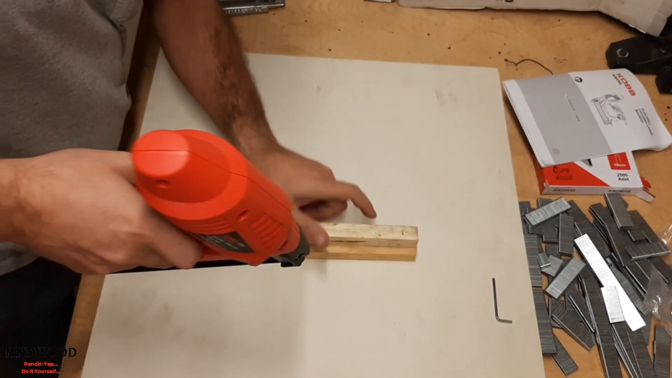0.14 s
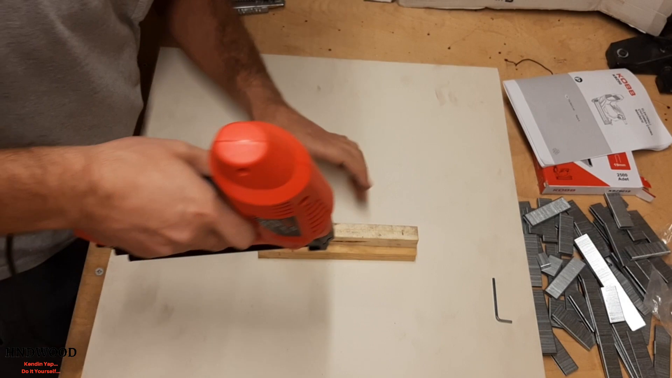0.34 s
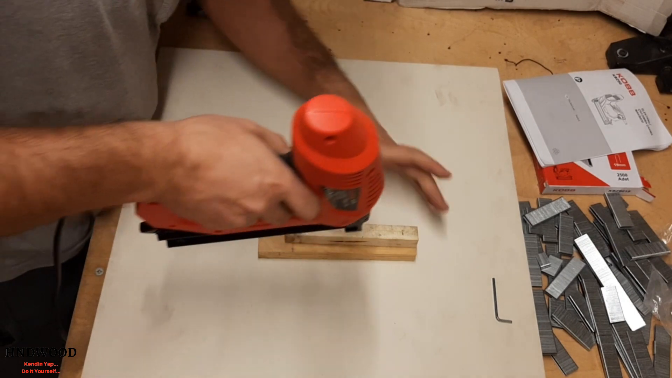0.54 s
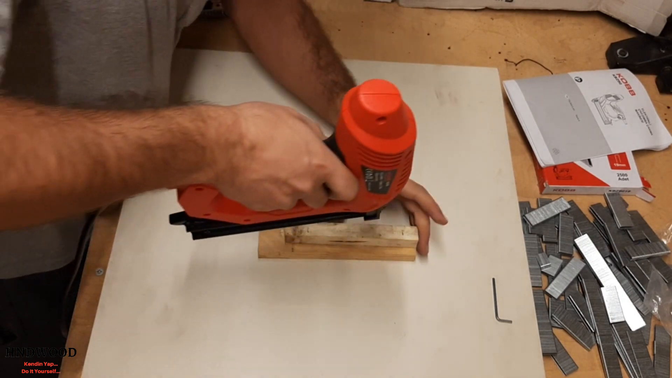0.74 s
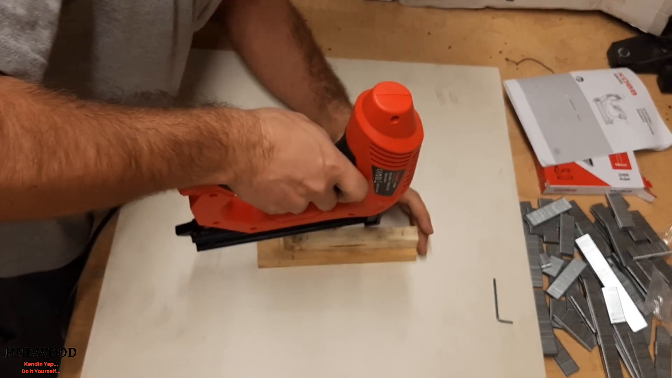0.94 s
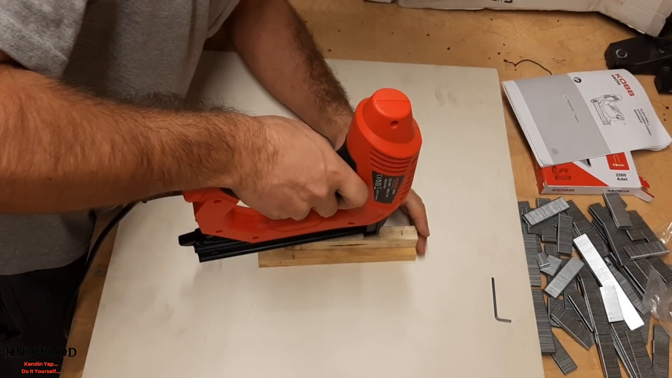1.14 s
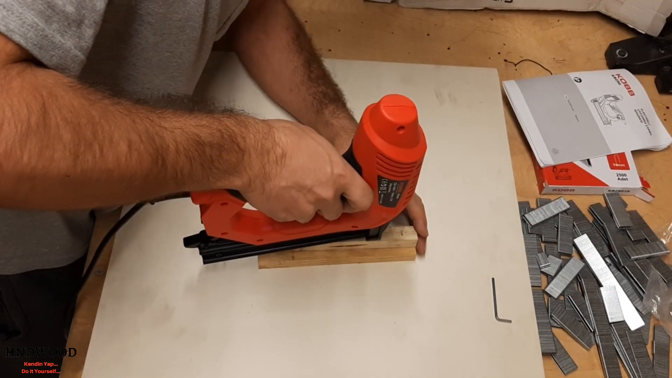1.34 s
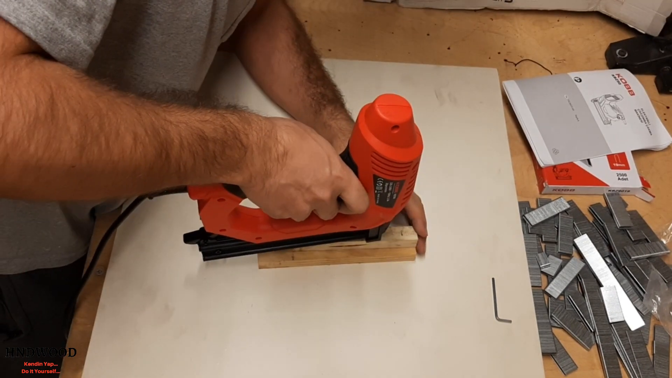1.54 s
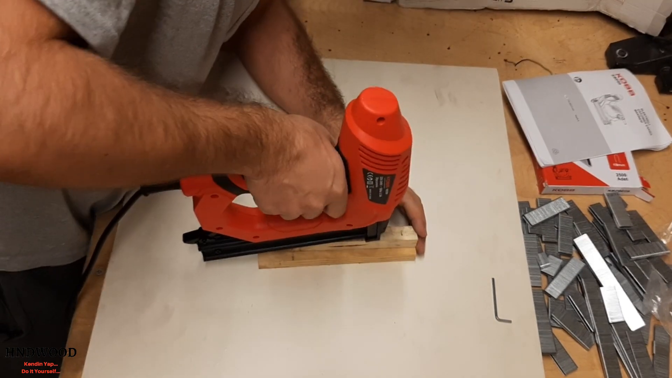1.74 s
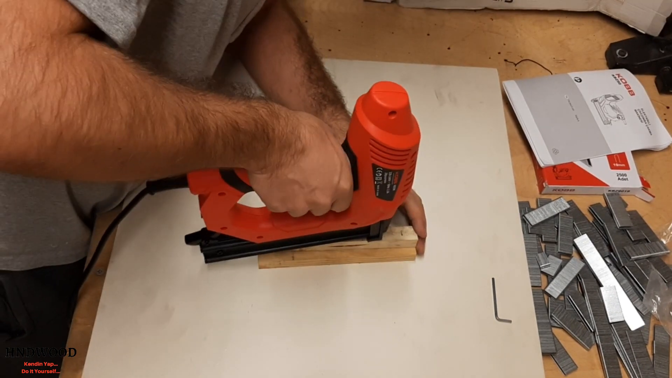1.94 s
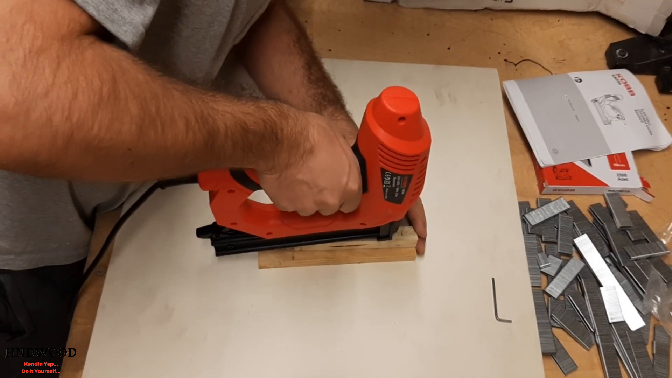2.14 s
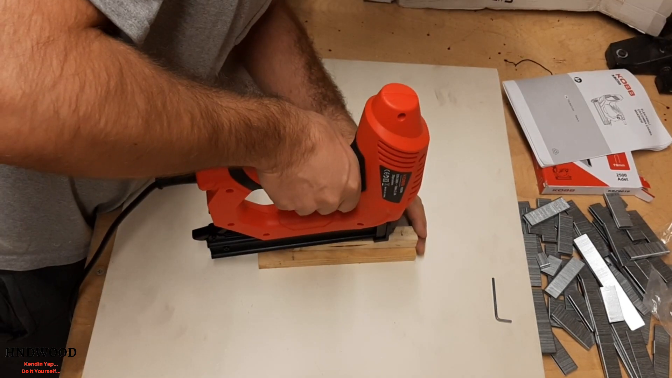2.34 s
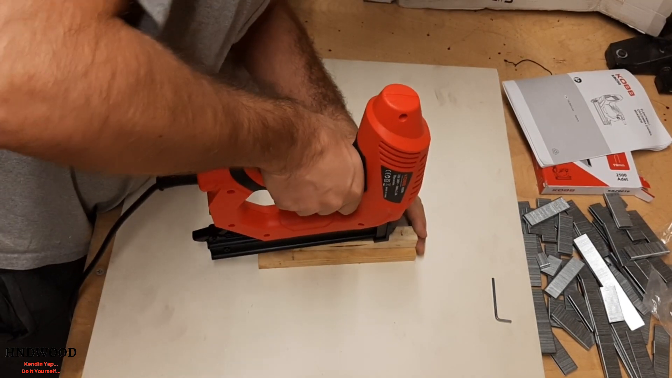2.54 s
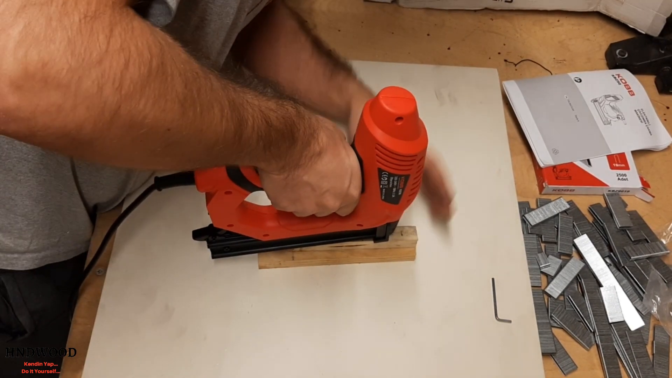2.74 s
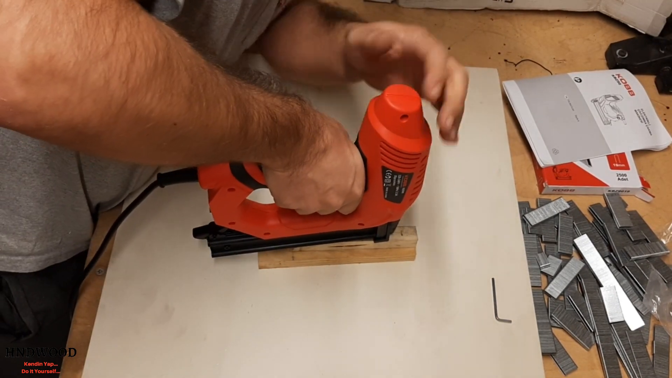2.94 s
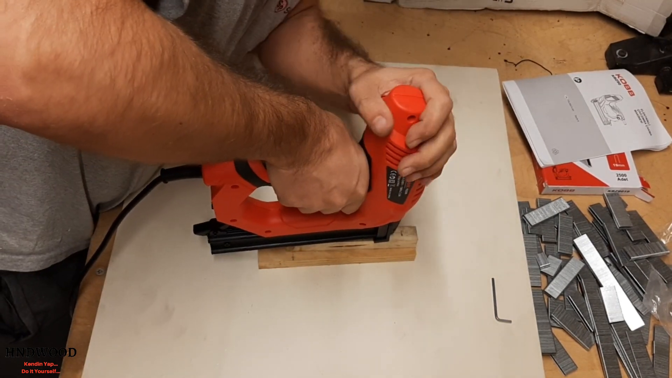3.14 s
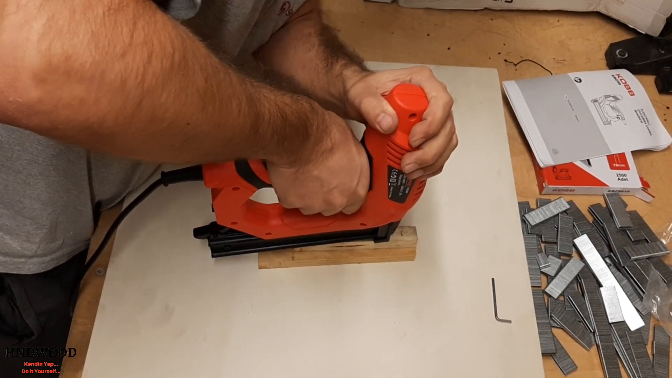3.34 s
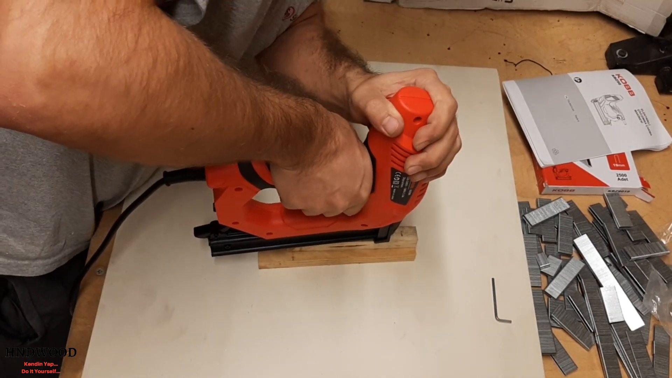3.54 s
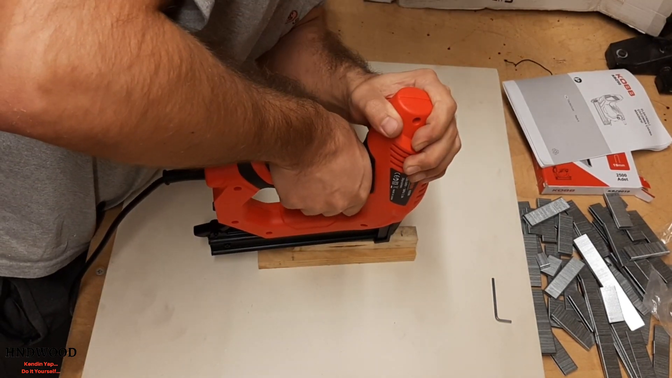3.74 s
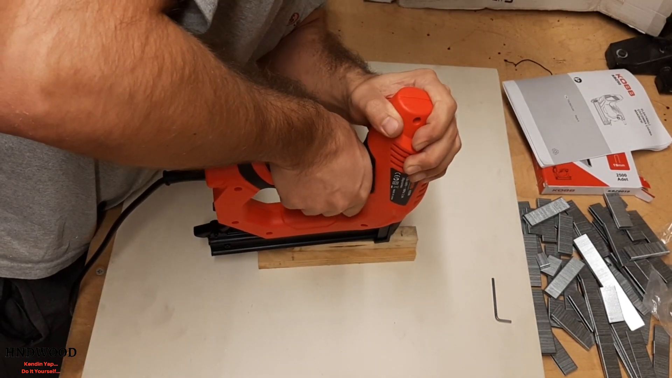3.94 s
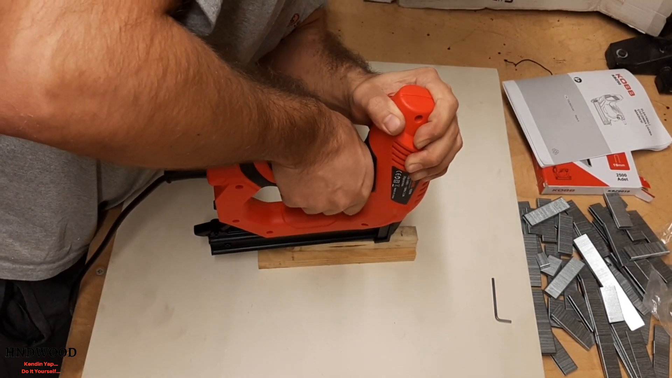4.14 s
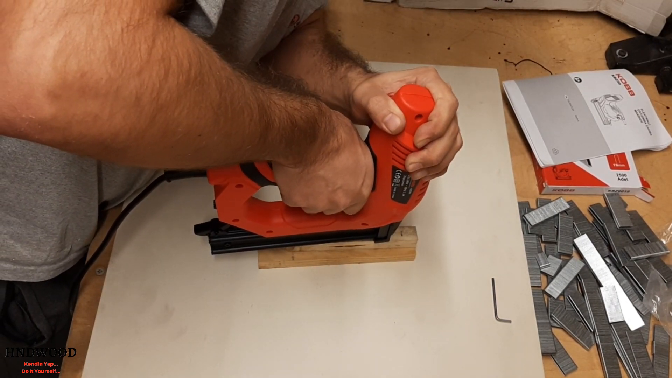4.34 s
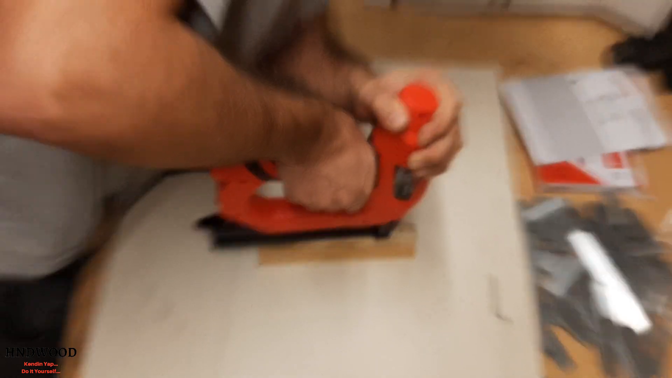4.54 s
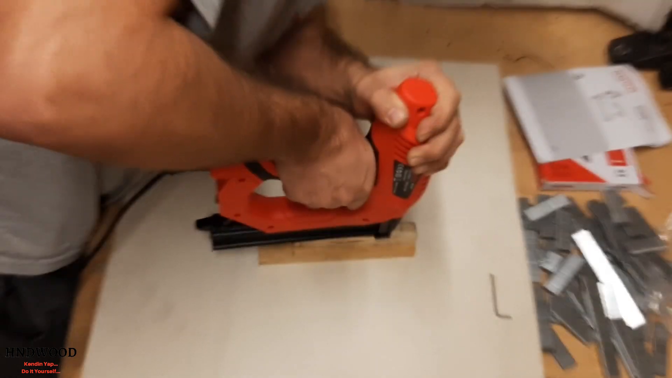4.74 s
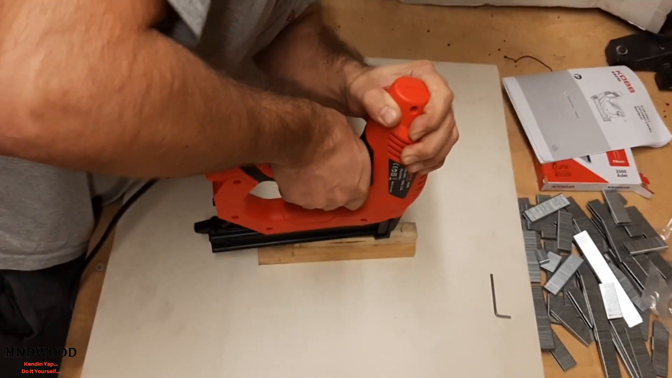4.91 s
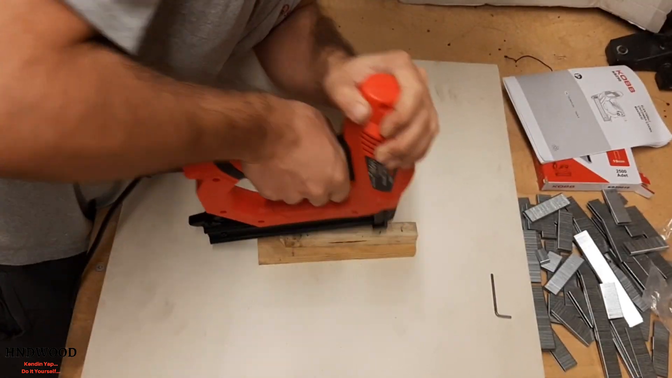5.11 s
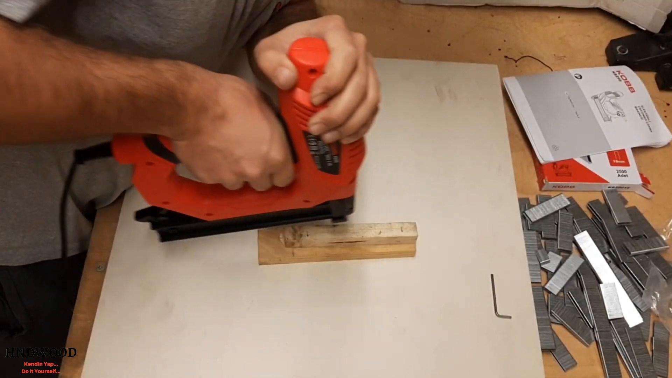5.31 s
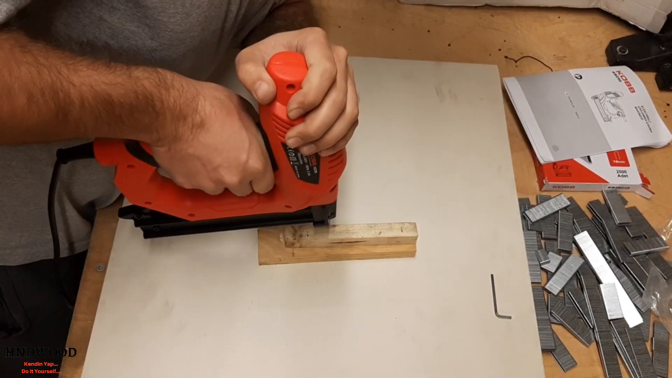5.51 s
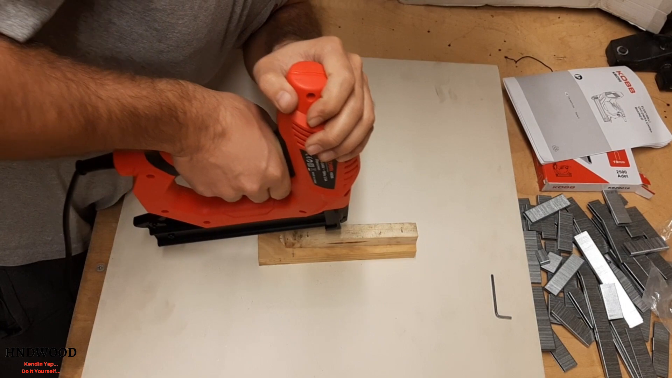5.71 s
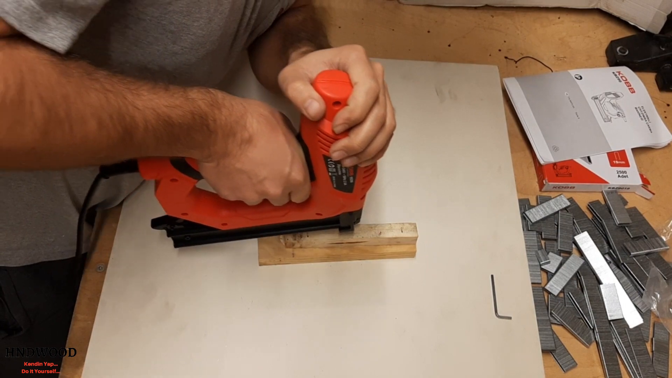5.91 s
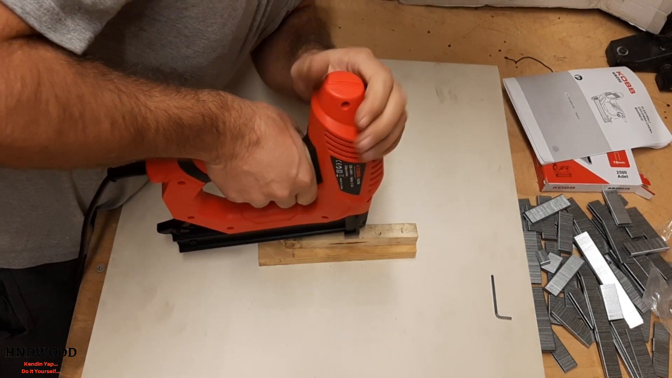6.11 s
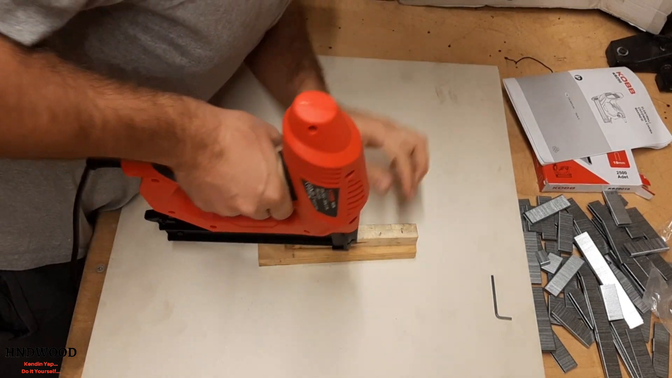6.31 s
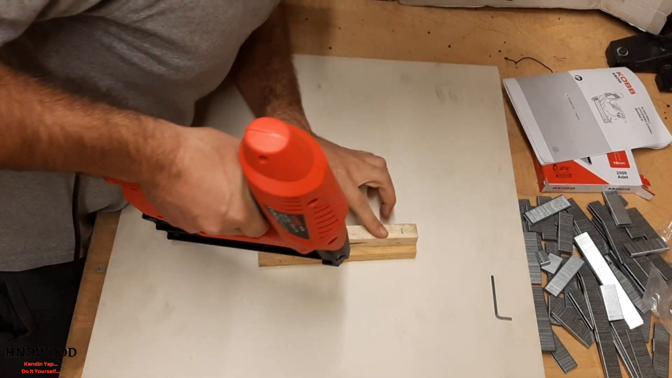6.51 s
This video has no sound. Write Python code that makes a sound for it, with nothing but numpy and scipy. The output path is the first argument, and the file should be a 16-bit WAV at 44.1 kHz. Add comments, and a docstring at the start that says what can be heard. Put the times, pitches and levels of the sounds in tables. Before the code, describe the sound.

Soft taps of a nailer settling on a wooden block, then a single loud crack with a thud, a click and short metallic chatter.

```python
"""An electric nailer is set on a wood block on a workbench: light knocks, scrapes, hands on the housing.
From about 4 s a faint hum swells and fades. At 4.5 s the trigger clicks; the solenoid slams the driver
onto the nail, the block cracks, the bench booms, the microphone's gain control ducks for a second.
The tool recoils, the plunger flies back, its spring chatters, the trigger is released; a last knock.
Throughout: a small workshop's reflections, low rumble and hiss."""
import sys
import numpy as np
from scipy import signal
from scipy.fft import rfft, irfft, next_fast_len
from scipy.io import wavfile
from scipy.ndimage import uniform_filter1d, minimum_filter1d

SR = 44100
rng = np.random.default_rng(int(sys.argv[2]) if len(sys.argv) > 2 else 0)


def file_out(sig):
    """Save sig as 16-bit WAV at sys.argv[1]."""
    # one column per channel
    cols = np.atleast_2d(sig).T
    # limit, then scale
    lim = np.clip(cols, -1, 1)
    pcm = np.round(lim * 32767).astype(np.int16)
    wavfile.write(sys.argv[1], SR, pcm)


N = 294044
TIME_S = np.arange(N) / SR
AGE_S = np.arange(2 ** 15) / SR  # time since a blow
FIRE_S, SHOT_LOW_HZ = 4.5982, 248

# nose on block: t/s, crack/dB, ring/dB, boom/dB, low cut/Hz, high cut/Hz, graze re crack/dB
KNOCKS = [(0.007, -45.5, -51, -58, 207, 4170, 3), (0.443, -46.5, -47.5, -66, 180, 2400, -6),
          (1.05, -74.5, -78, -80, 300, 1500, -10), (1.096, -64, -65, -77, 150, 600, -10),
          (1.470, -62, -61.5, -50.5, 135, 990, -5), (1.578, -64.5, -71, -54, 100, 300, -10),
          (1.805, -52.5, -50.5, -44.5, 100, 710, -1.5), (2.117, -44, -54.5, -40.5, 120, 875, -6.5),
          (2.406, -75.5, -75.5, -44.5, 150, 1200, -10), (6.497, -50, -48.5, -62, 540, 1170, -27)]
# safety tip, trigger, returning plunger, release: t/s, level/dB, high cut/Hz, room/dB, ring re level/dB
CLICKS = [(0.004, -51.5, 8750, -1, -10), (2.108, -54, 11400, -5.5, -20), (4.513, -36, 10200, -0.5, -29),
          (4.795, -26, 8500, -3.5, -27), (5.1225, -47, 6900, -3.5, -4)]
# nose dragged on block: mid t/s, length/s, level/dB
SCRAPES = [(0.843, 0.08, -58), (0.91, 0.13, -60), (1.468, 0.049, -62), (2.09, 0.14, -61),
           (2.235, 0.28, -74.5)]
# hands sliding on housing: mid t/s, length/s, level/dB, squeak f/Hz, squeak re level/dB
SWISHES = [(0.91, 0.15, -82.5, 5640, 0), (1.652, 0.063, -74, 3600, -21), (1.785, 0.3, -76, 3510, -7.5),
           (2.057, 0.13, -67.5, 11700, -8.5), (2.121, 0.062, -61, 4970, -12),
           (2.276, 0.11, -74.5, 11950, -4), (3.12, 0.086, -61, 5230, -14), (6.161, 0.077, -63.5, 2950, -17)]
# rumble swells as hands lean on the tool: mid t/s, length/s, level/dB
LEANS = [(1.994, 1.3, -60.5), (3.25, 0.34, -51), (4.602, 1.9, -54.5), (6.67, 1.13, -60)]
# hum swells: mid t/s, length/s, level/dB, f/Hz
HUMS = [(4.44, 0.6, -71, 465), (5.562, 0.61, -66, 464.5), (5.993, 0.26, -65, 440.2), (6.66, 0.22, -68, 468)]

# modes of block, bench, steel parts, return spring, hollow housing: f/Hz, level/dB, t60/s
WOOD_MODES = [(203, -4, .22), (275, -2, .28), (305, 3, .33), (337, -4, .28), (423, -1, .3), (500, -6, .33),
              (561, 3, .25), (640, -3, .22), (684, -3, .28), (937, -2, .2), (966, -5, .2), (1047, -7, .2),
              (1123, -2, .17), (1279, -4, .21), (1495, -4, .18), (1523, -3, .2), (1552, -7, .18),
              (2023, -6, .2), (2300, -8, .2), (2780, -11, .16)]
BENCH_MODES = [(55.5, -18, .4), (69, -3.5, 0.32), (76.8, 4, 0.48), (88, -7, 0.6), (101, -9.5, 0.61),
               (125.7, -8, 0.42)]
STEEL_MODES = [(2960, -10, .2), (5710, -10, .18), (6130, -6, .16), (6450, -3, .22), (7400, -3, .15),
               (12630, -4, .23), (14390, -10, .24)]
SPRING_MODES = [(700, -5, .15), (820, -4, .15), (930, -6, .14), (1850, -3, .05), (2370, -3, .06),
                (2850, 4, .025), (4430, 3, .017)]
HOUSING_MODES = [(133.2, -0.5, 0.38), (205.7, -4, 0.41), (305, 3, 0.23), (468, -13, 0.16), (568, -10, 0.17),
                 (1560, -4.5, .22)]

# source spectra and microphone response: f/Hz, level/dB
WOOD_SPECTRUM = [(40, -22), (150, -9), (280, 1), (370, -6), (450, -1), (620, 2), (780, -5), (1000, -2.5),
                 (1600, -6), (1900, -10), (3000, -12), (7000, -14), (16000, -21)]
STEEL_SPECTRUM = [(60, -20), (400, -11), (900, -9), (1400, -1.5), (2000, -2), (2700, 0.5), (3600, -2),
                  (5000, -1), (7500, 0), (11000, -3), (16000, -3)]
SPRING_SPECTRUM = [(100, -8.5), (800, -0.5), (1300, -6.5), (2400, -9), (2900, 1.5), (3500, -2.5),
                   (4400, -3.5), (7000, -6.5), (9000, -32), (16000, -20)]
SCRAPE_SPECTRUM = [(80, -10), (350, -14), (600, -0.5), (780, -7), (1100, -4.5), (1550, -10), (1900, -20.5),
                   (4000, -24), (16000, -39)]
SKIN_SPECTRUM = [(200, -28), (2200, -14.5), (3300, -4.5), (5500, -0.5), (7500, -5.5), (11000, -7.5),
                 (16000, -5)]
RUMBLE_SPECTRUM = [(15, -29), (32, -17), (45, -5), (57, 5.5), (75, -6), (100, -12), (125, -4.5),
                   (160, -19.5), (220, -20.5), (320, -27.5), (500, -46), (1500, -62)]
HISS_SPECTRUM = [(30, 7), (300, 12.5), (700, 3), (1500, 1.5), (3000, -2), (7000, -7), (9000, -0.5),
                 (12000, 0), (15500, 0.5)]
MIC_RESPONSE = [(5, -40), (22, -13), (42, 1), (7500, -2), (8300, -15), (9000, -18), (10000, -9),
                (12000, -2.5), (15500, 2), (16300, -13)]

# workshop decay: f/Hz, t60/s
ROOM_T60 = [(80, 0.86), (300, 0.33), (1000, 0.24), (3000, 0.29), (7000, 0.22), (15000, .26)]
# left-right coherence of direct and reflected sound: f/Hz, coherence/1
DIRECT_COHERENCE = [(100, 1), (300, .93), (700, .85), (1600, .55), (4000, .2), (12000, 0)]
DIFFUSE_COHERENCE = [(80, .97), (300, .8), (650, .4), (1400, 0), (16000, 0)]
# stereo balance: f/Hz, left minus right/dB
BALANCE = [(60, -1.15), (600, -3), (2000, -0.5), (5000, -2.5), (12000, -2.5)]


def nail(shove_gap_s=0.0033):
    """The nail sinks in three shoves, each weaker and duller; the block rings, the bench booms."""
    out = np.zeros((2, N))
    for k in range(3):
        shove = wood_crack(db=-1.5 - 2.5 * k, low_hz=SHOT_LOW_HZ, high_hz=4500 * 0.5 ** k, room_db=-1.5)
        add(out, FIRE_S + k * shove_gap_s, shove)
    block = wood_ring(db=2.5, low_hz=SHOT_LOW_HZ, high_hz=2800, spread_s=0.004)
    add(out, FIRE_S + shove_gap_s, block)
    add(out, FIRE_S + 0.004, bench_boom(db=-2))
    return out


def plunger(run_up_s=0.0102, growth_db_per_s=1899.5):
    """The solenoid pulls the plunger down its guide, rattling faster and louder, onto the nail."""
    out = np.zeros((2, N))
    for k in range(3):
        lead_s = run_up_s * (1 - k / 3) ** 1.35
        db = -12 - growth_db_per_s * lead_s
        add(out, FIRE_S - lead_s, steel_click(db, t60_s=0.037, high_hz=9300, room_db=-1.5, ring_db=-19.5))
    add(out, FIRE_S, steel_click(db=-10, t60_s=0.016, high_hz=16000, room_db=-4, ring_db=-21))
    return out


def recoil(drop_s=FIRE_S + 0.031, clatter_gap_s=0.0072):
    """The nailer drops back on the block; the plunger clatters against its stop."""
    out = np.zeros((2, N))
    add(out, drop_s, wood_crack(db=-10.5, low_hz=SHOT_LOW_HZ, high_hz=2550))
    for k in range(3):
        clatter = steel_click(-7.5 - 3 * k, t60_s=0.026, high_hz=14100 * 0.85 ** k, room_db=-1, ring_db=-10)
        add(out, drop_s + k * clatter_gap_s, clatter)
    return out


def spring(start_s=4.8, stop_s=5.0, fade_s=0.029, surge_hz=103, ping_hz=1780):
    """The return spring surges to and fro, pinging and buzzing, and sings as the plunger slides home."""
    gate = (1 + np.tanh((TIME_S - start_s) / fade_s)) * (1 - np.tanh((TIME_S - stop_s) / fade_s)) / 4
    surges = np.diff(np.floor(surge_hz * TIME_S), prepend=0) * rng.uniform(0.7, 1.3, N)
    ping = decay(t60_s=0.0096) * np.sin(2 * np.pi * ping_hz * AGE_S)
    pings = unit_rms(signal.oaconvolve(surges, ping)[:N]) * np.clip((stop_s - TIME_S) / 0.13, 0, 1)
    buzz = unit_rms(colour(convolve(surges[None], room_tail()), SPRING_SPECTRUM))
    slide = coloured_noise(DIFFUSE_COHERENCE, SPRING_SPECTRUM)
    song = rubbed_modes(SPRING_MODES) * np.clip((TIME_S - start_s) / 0.092, 0, 1)
    chatter = amp(-45) * pings + amp(-54) * buzz + amp(-52) * slide + amp(-49) * song
    return in_room(gate * chatter, room_db=-6)


def clicks(t60_s=0.017):
    """Small steel parts click before and after the shot."""
    out = np.zeros((2, N))
    for t_s, db, high_hz, room_db, ring_db in CLICKS:
        add(out, t_s, steel_click(db, t60_s, high_hz, room_db, ring_db))
    return out


def knocks(graze_lead_s=0.007, weight_lag_s=0.014, first_gap_s=0.0196, bounce_db=-5.5):
    """The nose grazes, lands and bounces; the housing rings, the tool's weight booms the bench."""
    out = np.zeros((2, N))
    for t_s, crack_db, ring_db, boom_db, low_hz, high_hz, graze_db in KNOCKS:
        add(out, t_s - graze_lead_s, wood_crack(crack_db + graze_db, low_hz, high_hz))
        add(out, t_s, amp(ring_db) * ring(HOUSING_MODES, low_hz, high_hz))
        add(out, t_s + weight_lag_s, bench_boom(boom_db))
        for k in range(3):
            dulled_hz = high_hz * 0.8 ** k
            landing = wood_crack(crack_db, low_hz, dulled_hz) + wood_ring(ring_db, low_hz, dulled_hz)
            add(out, t_s, amp(k * bounce_db) * landing)
            t_s += first_gap_s * 0.85 ** k
    return out


def wood_crack(db, low_hz, high_hz, t60_s=0.06, room_db=-2):
    """Short crack of a blow on the block."""
    return amp(db) * crack(WOOD_SPECTRUM, t60_s, low_hz, high_hz, room_db)


def wood_ring(db, low_hz, high_hz, spread_s=0.005):
    """Block modes swell as the blow spreads through the wood."""
    return amp(db) * unit_blow(ring(WOOD_MODES, low_hz, high_hz) * rise(spread_s))


def bench_boom(db, swell_s=0.0067, low_hz=46):
    """The bench top booms, radiating little below its lowest mode."""
    highpass = signal.butter(4, low_hz, "high", fs=SR, output="sos")
    return amp(db) * signal.sosfilt(highpass, ring(BENCH_MODES) * rise(swell_s))


def steel_click(db, t60_s, high_hz, room_db, ring_db):
    """Steel contact inside the nailer; harder contacts ring higher modes."""
    tone = unit_blow(ring(STEEL_MODES, 0.48 * high_hz, high_hz))
    return amp(db) * (crack(STEEL_SPECTRUM, t60_s, 0, high_hz, room_db) + amp(ring_db) * tone)


def scrapes(modes_db=2):
    """The nose drags over the grain and excites the block's modes."""
    pressure = sum(amp(db) * swell(t_s, length_s) for t_s, length_s, db in SCRAPES)
    tone = unit_rms(colour(rubbed_modes(WOOD_MODES), SCRAPE_SPECTRUM))
    rasp = unit_rms(friction(SCRAPE_SPECTRUM) + amp(modes_db) * tone)
    return in_room(pressure * rasp, room_db=-4)


def swishes():
    """Skin hisses over plastic, squeaking faintly."""
    hiss = friction(SKIN_SPECTRUM)
    out = np.zeros((2, N))
    for t_s, length_s, db, squeak_hz, squeak_db in SWISHES:
        squeak = amp(squeak_db) * fuzzy_tone(squeak_hz, width_hz=450)
        out += amp(db) * swell(t_s, length_s) * (hiss + squeak)
    return in_room(out, room_db=-4)


def background(hum_width_hz=70):
    """Microphone hiss, bench and room rumble; from about 4 s, swells of a faint hum, one of its octave."""
    hiss = amp(-76) * coloured_noise(DIFFUSE_COHERENCE, HISS_SPECTRUM)
    lean_power = sum((amp(db) * swell(t_s, length_s)) ** 2 for t_s, length_s, db in LEANS)
    rumble = np.sqrt(amp(-62) ** 2 + lean_power) * coloured_noise(DIRECT_COHERENCE, RUMBLE_SPECTRUM)
    times_s, _, _, pitches_hz = np.transpose(HUMS)
    hum_hz = np.interp(TIME_S, times_s, pitches_hz)
    hum_gain = sum(amp(db) * swell(t_s, length_s) for t_s, length_s, db, _ in HUMS)
    hum = hum_gain * fuzzy_tone(hum_hz, hum_width_hz)
    octave = amp(-78) * swell(mid_s=4.33, length_s=0.22) * fuzzy_tone(2 * hum_hz, hum_width_hz)
    return hiss + rumble + hum + octave


def crack(spectrum, t60_s, low_hz, high_hz, room_db):
    """Dense, quickly damped modes of a struck part, plus reflections."""
    direct = unit_blow(noise_pair(DIRECT_COHERENCE, len(AGE_S)) * decay(t60_s))
    blow = colour(direct + amp(room_db) * room_tail(), spectrum, low_hz, high_hz)
    return unit_blow(blow) * np.hypot(1, amp(room_db))


def ring(modes, low_hz=0, high_hz=SR):
    """Clear modes; higher ones reach left and right out of phase."""
    out = np.zeros((2, len(AGE_S)))
    for k, (hz, db, t60_s) in enumerate(modes):
        skew_rad = (-1) ** k * np.arccos(lookup(DIRECT_COHERENCE, hz)) / 2
        tone = np.sin(2 * np.pi * hz * AGE_S + np.array([[skew_rad], [-skew_rad]]))
        out += amp(db + contact_db(hz, low_hz, high_hz)) * decay(t60_s) * tone
    return out


def contact_db(hz, low_hz, high_hz):
    """Band a contact excites: a small tip moves little bass, a slow one little treble."""
    return -10 * np.log10((1 + (hz / high_hz) ** 6) * (1 + (low_hz / (hz + 1)) ** 6))


def friction(spectrum, grain_db=2):
    """Noise catching in grains of about 2 ms."""
    grains = amp(grain_db * unit_rms(uniform_filter1d(rng.standard_normal(N), size=90)))
    return unit_rms(colour(noise_pair(DIRECT_COHERENCE, N) * grains, spectrum))


def rubbed_modes(modes):
    """Modes kept sounding by friction."""
    return unit_rms(convolve(noise_pair(DIFFUSE_COHERENCE, N), ring(modes)))


def fuzzy_tone(hz, width_hz):
    """Narrow noise shifted up to a pitch."""
    lowpass = signal.butter(2, width_hz / 2, fs=SR, output="sos")
    waver = signal.sosfilt(lowpass, rng.standard_normal((2, N)))
    phase_rad = 2 * np.pi * np.cumsum(hz * np.ones(N)) / SR
    return unit_rms(waver[0] * np.cos(phase_rad) + waver[1] * np.sin(phase_rad))


def room_tail(build_s=0.002):
    """Diffuse reflections, each band with its own decay."""
    hz, t_s, bands = signal.stft(noise_pair(DIFFUSE_COHERENCE, len(AGE_S)), SR, nperseg=256)
    _, tail = signal.istft(bands * amp(-60 * t_s / lookup(ROOM_T60, hz)[:, None]), SR)
    return unit_blow(tail[:, :len(AGE_S)] * rise(build_s))


def in_room(x, room_db):
    """A sustained sound plus reflections."""
    tail = room_tail()
    return x + amp(room_db) * convolve(x, tail / np.linalg.norm(tail[0]))


def noise_pair(coherence, size):
    """Stereo white noise, alike in the bass, unrelated in the treble."""
    n_fft = next_fast_len(size, True)
    mid, side = rfft(rng.standard_normal((2, n_fft)))
    alike = lookup(coherence, np.fft.rfftfreq(n_fft, 1 / SR))
    mid, side = mid * np.sqrt((1 + alike) / 2), side * np.sqrt((1 - alike) / 2)
    return irfft(np.array([mid + side, mid - side]), n_fft)[:, :size]


def coloured_noise(coherence, spectrum):
    return unit_rms(colour(noise_pair(coherence, N), spectrum))


def colour(x, spectrum, low_hz=0, high_hz=SR, n_fft=8192):
    """Minimum-phase filter: spectrum times contact band."""
    hz = abs(np.fft.fftfreq(n_fft, 1 / SR))
    log_gain = np.log(amp(lookup(spectrum, hz) + contact_db(hz, low_hz, high_hz)) + 1e-5)
    taps = np.fft.ifft(np.exp(signal.hilbert(log_gain).conj())).real[:n_fft // 2]
    return convolve(x, taps[None])


def convolve(x, response):
    return signal.oaconvolve(x, response, axes=1)[:, :x.shape[1]]


def lookup(table, hz):
    """Interpolates over log frequency."""
    table_hz, values = np.transpose(table)
    return np.interp(np.log(hz + 1), np.log(table_hz + 1), values)


def swell(mid_s, length_s):
    return np.exp(-8 * ((TIME_S - mid_s) / length_s) ** 2)


def rise(tau_s):
    return 1 - np.exp(-AGE_S / tau_s)


def decay(t60_s):
    return amp(-60 * AGE_S / t60_s)


def amp(db):
    return 10 ** (np.asarray(db) / 20)


def unit_rms(x):
    return x / np.sqrt(np.mean(x ** 2) + 1e-20)


def unit_blow(x):
    """Scales to the energy of 10 ms at rms 1."""
    return unit_rms(x) * np.sqrt(0.01 * SR / x.shape[-1])


def add(mix, t_s, sound):
    part = mix[:, max(round(t_s * SR), 0):][:, :sound.shape[1]]
    part += sound[:, :part.shape[1]]


def scene():
    """All sources, slightly right of centre."""
    shot = plunger() + nail() + recoil() + spring()
    mix = shot + knocks() + clicks() + scrapes() + swishes() + background()
    n_fft = next_fast_len(N + len(AGE_S), True)
    left_db = lookup(BALANCE, np.fft.rfftfreq(n_fft, 1 / SR)) / 2
    return irfft(rfft(mix, n_fft) * amp([left_db, -left_db]), n_fft)[:, :N]


def record(dry, limit_db=-8, hold_s=0.98, recover_db_per_s=13, edge_hz=16400):
    """Microphone colour; gain control that ducks at once, holds, recovers; soft overload; band limit."""
    x = colour(dry, MIC_RESPONSE)
    power_db = 10 * np.log10(abs(uniform_filter1d((x ** 2).mean(0), size=300)) + 1e-12)
    needed_gain_db = np.minimum(limit_db - power_db, 0)
    hold_n = int(hold_s * SR)
    held_cut_db = -minimum_filter1d(needed_gain_db, hold_n, origin=(hold_n - 1) // 2, mode="constant")
    recovery_db = TIME_S * recover_db_per_s
    cut_db = np.maximum.accumulate(held_cut_db + recovery_db) - recovery_db
    x = np.tanh(x / amp(cut_db))
    lowpass = signal.firwin(255, edge_hz, window=("kaiser", 9), fs=SR)
    return signal.oaconvolve(x, lowpass[None], "same", axes=1)


dry = scene()
out = record(dry)
file_out(out)
```